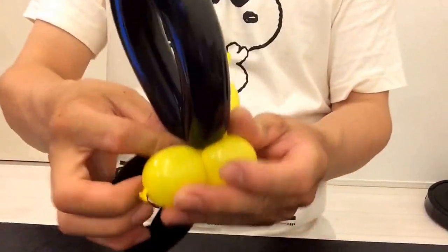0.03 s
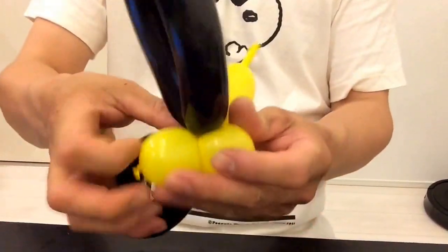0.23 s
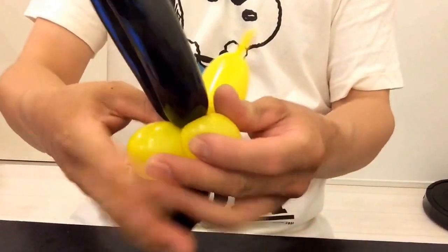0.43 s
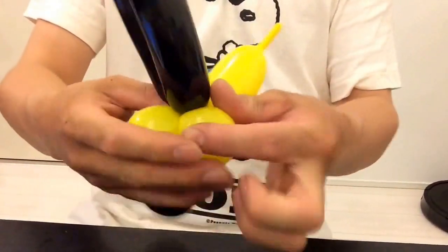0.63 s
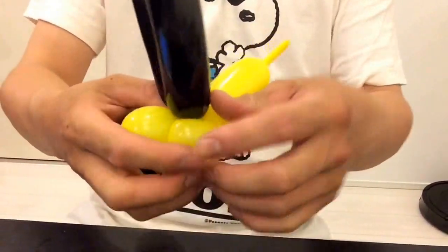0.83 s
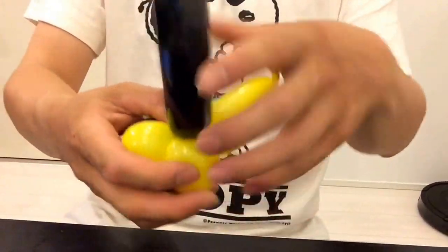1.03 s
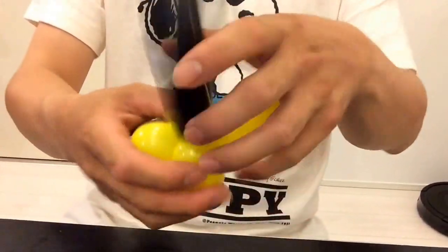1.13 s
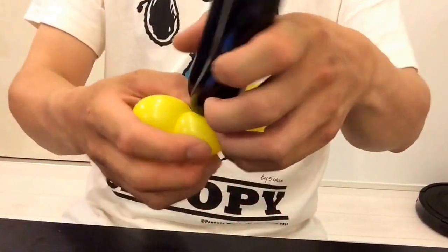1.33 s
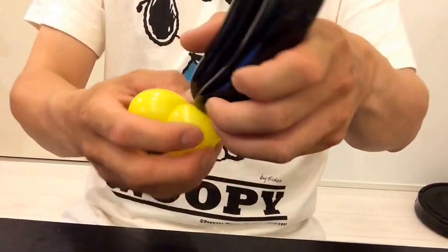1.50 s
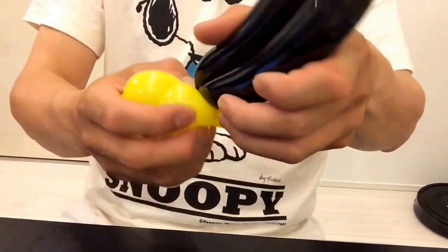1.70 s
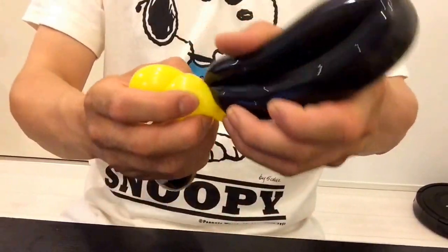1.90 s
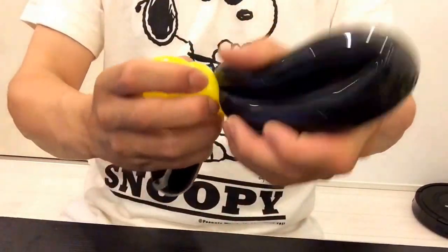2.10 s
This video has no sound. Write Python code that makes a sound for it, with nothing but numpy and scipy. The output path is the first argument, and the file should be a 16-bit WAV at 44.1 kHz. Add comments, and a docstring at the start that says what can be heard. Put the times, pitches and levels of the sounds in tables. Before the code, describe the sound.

Long latex balloons are twisted in two hands: sharp rubbery slips and tiny squeaks over short rubbing strokes, a soft finger thud midway, then brighter snaps near the end, close phone microphone in a small room.

```python
"""A sharp slip of rubber over a rubbing stroke opens the scene: long latex balloons are twisted in
two hands close to a phone in a small room. Stuck rubber that lets go is a noise burst exciting damped
modes, rubbing is a dense train of tiny grains through such modes, and short squeaks are stick-slip
harmonics. Fingers thud on the air-filled tubes as single damped swings; a low hum, sums of sines,
comes and goes over room tone of filtered noise."""
import sys
import numpy as np
from scipy import signal
from scipy.fft import rfft, irfft
from scipy.io import wavfile
from scipy.ndimage import uniform_filter1d

SR = 44100
rng = np.random.default_rng(int(sys.argv[2]) if len(sys.argv) > 2 else 0)


def boost_factor(decibels):
    """Convert a level in decibels to a linear amplitude factor."""
    exponent = np.asarray(decibels, float) / 20
    return 10 ** exponent


def master_out(mix):
    """Clip the mix to full scale and print it as 16-bit PCM to the path in sys.argv[1]."""
    frames = np.transpose(np.atleast_2d(mix))
    ceiling = np.clip(frames, -1, 1)
    pcm = np.round(ceiling * 32767).astype(np.int16)
    wavfile.write(sys.argv[1], SR, pcm)


N = 94815  # length [samples]

# modes of the enclosed air, the skin and the snap range, before ring() shifts and tilts them:
# (nominal frequency [Hz], relative level [dB], t60 [s])
TUBE = [(431, 0, 0.02)]
SKIN = [(720, -0.5, 0.011), (1120, 8.9, 0.0083), (1470, 4.8, 0.0099), (1900, 11.5, 0.0097)]
SNAP = [(3290, -4.5, 0.0098), (4270, 4.5, 0.0019), (6120, -2, 0.0011), (7000, -2.5, 0.0011),
        (10620, -13, 0.0073), (14100, -15, 0.00074)]


def add(out, x, s):
    """Superposition: mix x into out from time s [s], or from the start if s is negative."""
    i = max(int(s * SR), 0)
    out[i:i + len(x)] += x[:N - i]


def unit(x):
    """Normalization of signal power: scale to rms 1."""
    return x / np.sqrt(np.mean(x ** 2) + 1e-18)


def ring(modes, shift=0.92, tilt_db=0., size=2048):
    """Modal superposition: response of damped modes without steady pressure, energy 1.

    shift multiplies the nominal frequencies; tilt_db is in dB per octave."""
    t = np.arange(size) / SR
    nominal_hz, level_db, t60 = np.hsplit(np.array(modes, float), 3)
    hz = np.minimum(nominal_hz * shift, .45 * SR)
    gain = boost_factor(level_db + tilt_db * np.log2(hz)) / np.sqrt(t60)
    decay = np.exp(-np.log(1000) * t / t60)
    h = (gain * np.sin(2 * np.pi * hz * t) * decay).sum(axis=0)
    high_pass = signal.butter(2, .7 * nominal_hz[0, 0], "high", fs=SR, output="sos")
    h = signal.sosfilt(high_pass, h)
    return h / np.sqrt(np.sum(h ** 2))


def tilts(s):
    """Position-dependent modal excitation: tilts of skin, tube and snap [dB per octave] at time s."""
    # the contact wanders over the tubes and favours lower or higher modes:
    # (time [s], skin tilt [dB per octave], snap tilt [dB per octave])
    tilt_path = [(0, -3.5, -7.5), (1.3, 1, 1), (1.36, -9, 14.5), (1.6, -2, 2.5)]
    time, skin_tilt, snap_tilt = np.array(tilt_path, float).T
    return np.interp(s, time, skin_tilt), 0., np.interp(s, time, snap_tilt)


def rub():
    """Friction as a random train of micro-slips plus sliding hiss, filtered by the balloon modes."""
    # strokes of hand or tube along a tube: (start [s], end [s], level at the start [dB],
    # snap level relative to skin [dB], tube level relative to skin [dB])
    strokes = [(0, 0.099, -36, -3, 0.5), (0.134, 0.269, -35.5, 0, -4), (0.214, 0.374, -38.5, 1.5, -23),
               (0.337, 0.516, -38, -4, -30), (0.52, 0.622, -35.5, -3, -5.5),
               (0.631, 0.693, -37.5, -3.5, -7.5), (0.705, 0.775, -37.5, -10, -15),
               (0.824, 0.968, -39, -0.5, -14.5), (1.014, 1.11, -39.5, 0, -5.5),
               (1.148, 1.31, -34.5, -5, -9), (1.352, 1.43, -41.5, -3, -8), (1.44, 1.56, -35, 0, -12),
               (1.746, 1.786, -56.5, 17.5, -16), (1.836, 1.87, -47, 8.5, -17),
               (1.964, 2.084, -35.5, -3, -39), (2.111, 2.149, -37, -3, -22)]
    grains_per_s, spread_db, largest_db = 700, 4, 11  # mean and largest excess over the smallest grain
    grain_decay_s, hiss_db = 0.00033, -6  # hiss relative to the grains
    attack_s, fall_db, release_s = 0.0039, 3.5, 0.036

    t, out = np.arange(N) / SR, np.zeros(N)
    struck = rng.random(N) < grains_per_s / SR
    size_db = np.minimum(spread_db * rng.exponential(size=N), largest_db)
    grain_shape = np.exp(-np.arange(128) / SR / grain_decay_s)
    grain_envelope = signal.fftconvolve(struck * boost_factor(size_db), grain_shape)[:N]
    grains = unit(grain_envelope * rng.standard_normal(N))
    friction = unit(grains + boost_factor(hiss_db) * rng.standard_normal(N))

    for start, end, db, snap_db, tube_db in strokes:
        env = np.clip(np.minimum((t - start) / attack_s, (end - t) / release_s), 0, 1)
        env = env * boost_factor(db - fall_db * np.clip((t - start) / (end - start), 0, 1))
        ranges = zip((SKIN, TUBE, SNAP), (0, tube_db, snap_db), tilts((start + end) / 2))
        body = sum(boost_factor(gain_db) * ring(modes, tilt_db=tilt_db) for modes, gain_db, tilt_db in ranges)
        out += signal.fftconvolve(friction * env, body)[:N]
    return out


def air():
    """Room tone as stationary Gaussian noise shaped in the frequency domain."""
    # room tone spectrum: (frequency [Hz], relative spectral level [dB per Hz])
    air_spectrum = [(15, -31), (25, -0.5), (195, -4.5), (575, -9.5), (1020, -6.5), (4140, -13.5),
                    (7510, -18.5), (14400, -27), (16000, -48)]
    level_db = -51  # rms
    hz = np.fft.rfftfreq(N, 1 / SR)
    point_hz, point_db = np.array(air_spectrum, float).T
    gain = boost_factor(np.interp(np.log(hz + 1), np.log(point_hz), point_db))
    noise = irfft(rfft(rng.standard_normal(N)) * gain, N)
    return boost_factor(level_db) * unit(noise)


def slips():
    """Impulsive modal excitation: each tearing burst rings skin, tube and snap, tuned a little apart."""
    # rubber lets go, levels before range_gain_db and per 10 ms of energy:
    # (time [s], skin level [dB], tube level [dB], snap level [dB])
    single_slips = [(0.002, -15, -36, -37), (0.026, -30.5, -47, -36.5), (0.058, -28.5, -39.5, -37),
                    (0.151, -15.5, -31, -23), (0.176, -24.5, -32.5, -29), (0.201, -22.5, -30.5, -30),
                    (0.212, -16, -35, -26), (0.223, -11, -37, -18), (0.356, -10, -22.5, -33),
                    (0.429, -48, -43.5, -26), (0.455, -26, -32.5, -49), (0.631, -45, -49, -34),
                    (0.708, -22, -55, -34), (0.719, -30, -37.5, -33), (0.804, -31, -39, -36),
                    (0.834, -18, -35.5, -22.5), (0.855, -43, -44, -26), (0.925, -31, -43, -25.5),
                    (0.954, -40, -49, -34), (0.996, -24, -50, -29), (1.025, -30, -56, -25.5),
                    (1.118, -29.5, -64, -42), (1.13, -29, -73, -44), (1.143, -25, -53, -38),
                    (1.157, -35, -28, -25.5), (1.2012, -15, -38, -30.5), (1.298, -23.5, -45, -33),
                    (1.311, -19.5, -43, -34), (1.353, -29, -45, -53), (1.4215, -23, -53, -30.5),
                    (1.4315, -19, -35, -27), (1.445, -23.5, -45, -37), (1.450, -23.5, -38.5, -46),
                    (1.480, -43, -31.5, -35), (1.487, -26, -54, -33), (1.567, -34, -59, -27.5),
                    (1.614, -48, -53, -25), (1.657, -48, -68, -24.5), (1.673, -30, -40, -37),
                    (1.6936, -10, -32.5, -14), (1.7223, -11.5, -33, -12), (1.928, -16, -38, -29.5),
                    (1.9463, -6.5, -22.5, -9.5), (1.9733, -7, -29.5, -9), (1.993, -26, -31, -29),
                    (2.007, -17.5, -38, -42), (2.035, -25, -55, -26.5), (2.051, -24.5, -59, -30),
                    (2.086, -31, -43.5, -35), (2.121, -28, -32, -30)]
    # trains of slow even slips, none where the end is not after the start:
    # (start [s], end [s], rate [slips per s], skin level [dB], tube level [dB], snap level [dB])
    creaks = [(1.212, 1.25, 74, -21, -42, -38), (1.6, 1.386, 120, -25, -55, -40),
              (1.387, 1.411, 230, -25.5, -46, -37.5), (1.3, 1.3, 230, -30, -64, -27),
              (.73, .778, 160, -31, -44.5, -32.5)]
    # gain of each range: (skin [dB], tube [dB], snap [dB])
    range_gain_db = (-12.5, -5, -8)
    # modes of the long loop, bent over from loop_from_s on, before detuning and tilt:
    # (nominal frequency [Hz], relative level [dB], t60 [s])
    loop_skin = [(818, 9, .008), (1594, 4, 0.0073), (1980, 1, .009), (2390, -9, 0.0049)]
    loop_snap = [(3250, 3, .005), (3820, 1.1, .005), (4400, 2, .004)] + SNAP[2:]
    loop_from_s = 1.55
    creep_s, creep_db = .0012, -18  # the contact crackles up before it tears
    tear_decay_s, skin_late_s = 0.0026, .0005  # decay of the tearing; lag of skin and tube
    creak_scatter_db = 2

    out, t = np.zeros(N), np.arange(-220, 256) / SR
    events = list(single_slips)
    for start, end, rate, *range_db in creaks:
        for s in np.arange(start, end, 1 / rate):
            time_chance, level_chance = rng.standard_normal(2)
            levels = np.array(range_db) + creak_scatter_db * level_chance
            events.append((s + .1 * time_chance / rate, *levels))

    creep = boost_factor(creep_db) * np.exp(t / creep_s)
    shape = np.where(t < 0, creep, np.exp(-t / tear_decay_s))
    lags = (skin_late_s, skin_late_s, 0)
    for s, *range_db in events:
        if s > loop_from_s:
            body, detune, release_db = (loop_skin, TUBE, loop_snap), 0.035, 22
        else:
            body, detune, release_db = (SKIN, TUBE, SNAP), 0.08, 18
        # one clean release amid the crackle
        tear = rng.standard_normal(len(t)) * shape + boost_factor(release_db) * (t == 0)
        for modes, db, gain_db, tilt_db, lag in zip(body, range_db, range_gain_db, tilts(s), lags):
            shift = 1 + detune * rng.standard_normal((len(modes), 1))
            y = signal.fftconvolve(tear, ring(modes, shift, tilt_db))
            y = y / np.sqrt(np.sum(y ** 2) / 441)  # energy per 10 ms
            add(out, y * boost_factor(db + gain_db), s + lag + t[0])
    return out


def hum():
    """Steady sinusoidal vibration under linear fades: low tones that come and go."""
    # (start [s], end [s], frequency [Hz], rms level between the fades [dB])
    hum_tones = [(0.03, 0.132, 96, -40), (1.235, 2.2, 119.9, -49)]
    fade_s = 0.023
    t, out = np.arange(N) / SR, np.zeros(N)
    for start, end, hz, db in hum_tones:
        fade = np.clip(np.minimum(t - start, end - t) / fade_s, 0, 1)
        out += boost_factor(db) * np.sqrt(2) * np.sin(2 * np.pi * hz * t) * fade
    return out


def squeaks():
    """Regular stick-slip as a harmonic series settling on a pitch, with uneven periods and strength."""
    # (start [s], length [s], initial frequency [Hz], settled frequency [Hz], fundamental level [dB],
    # second harmonic over fundamental [dB], fall per further harmonic [dB], roughness [0-1])
    squeak_rows = [(0.2224, 0.0072, 1692, 1700, -3, -21, 16, 0.33),
                   (0.228, 0.0049, 2354, 1900, -7, -14, 6, 0.46),
                   (0.2298, .013, 1034, 1169, -10, -3, 7, 0.17),
                   (0.355, 0.004, 1270, 1550, -11.5, -18.5, 10, 0.26),
                   (0.5604, 0.013, 200, 1680, -19, 1, 12, 0.2),
                   (1.2521, 0.015, 3010, 2920, -23.5, -12, 6, 0.22)]
    jitter = 0.16  # relative pitch scatter at full roughness
    attack, glide_s = 0.31, 0.0036  # share of the length; settling time constant

    out = np.zeros(N)
    for s, length, hz0, hz1, db, second_db, fall_db, rough in squeak_rows:
        t = np.arange(int(length * SR)) / SR
        noise = rng.standard_normal((6, 1024))
        wobble = uniform_filter1d(noise, size=25, axis=1)[:, :len(t)] * 5
        hz = hz1 + (hz0 - hz1) * np.exp(-t / glide_s)
        phase = 2 * np.pi * np.cumsum(hz * (1 + jitter * rough * wobble[5])) / SR
        tone = np.zeros(len(t))
        for k in range(4):
            harmonic_db = second_db - fall_db * (k - 1) if k > 0 else 0
            tone += boost_factor(harmonic_db) * (1 + rough * wobble[k]) * np.cos((k + 1) * phase)
        env = np.sqrt(np.interp(t / length, [0, attack, 1], [0, 1, 0]))
        add(out, boost_factor(db) * tone * env, s)
    return signal.sosfilt(signal.butter(4, 350, "high", fs=SR, output="sos"), out)


def thuds():
    """Impulse response of a single damped resonance: fingers land softly on a tube."""
    # (time [s], nominal frequency before the default shift of ring() [Hz], peak level [dB], t60 [s])
    thud_rows = [(0.61, 60, -46.5, 0.066), (.945, 182, -44, 0.033), (1.1698, 354, -21.5, 0.014),
                 (1.2031, 458, -21.5, 0.025), (1.203, 131, -26, 0.036), (1.204, 60, -27.5, 0.029)]
    out = np.zeros(N)
    for s, hz, db, t60 in thud_rows:
        swing = ring([(hz, 0, t60)], size=8192)
        add(out, boost_factor(db) * swing / swing.max(), s)
    return out


def room_echo(dry):
    """Diffuse reverberation: convolution with exponentially decaying, low-passed noise."""
    t60_s, level_db, gap_s, top_hz = 0.36, -17.5, 0.0013, 5600
    t = np.arange(SR // 2) / SR
    tail = signal.lfilter(*signal.butter(1, top_hz, fs=SR), rng.standard_normal(len(t)))
    tail = tail * np.exp(-np.log(1000) * t / t60_s) * (t > gap_s)
    tail = tail / np.sqrt(np.sum(tail ** 2))
    return boost_factor(level_db) * signal.fftconvolve(dry, tail)[:N]


def scene():
    """Linear superposition of the balloons, their echo in the room, hum and room tone."""
    balloons = rub() + slips() + squeaks() + thuds()
    return (balloons + room_echo(balloons) + air() + hum())[None]


def roll_off(x):
    """The treble ends steeply here."""
    return signal.sosfilt(signal.butter(12, 16450, fs=SR, output="sos"), x)


def record(dry):
    """Band limiting and amplitude saturation: the phone cuts the lowest bass, clips, then cuts the top."""
    low_hz, top_hz = 60, 15250
    x = signal.sosfilt(signal.butter(2, low_hz, "high", fs=SR, output="sos"), dry)
    x = np.clip(x, -1, 1)
    x = signal.sosfilt(signal.ellip(8, .2, 60, top_hz, fs=SR, output="sos"), x)
    return roll_off(x)


dry = scene()
out = record(dry)
master_out(out)
```